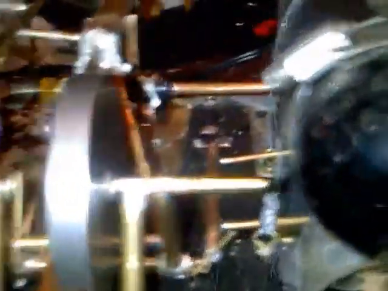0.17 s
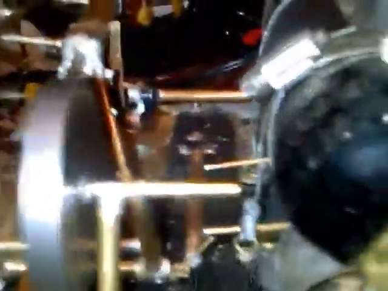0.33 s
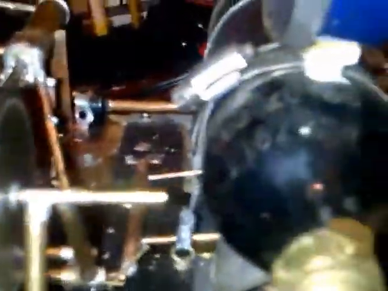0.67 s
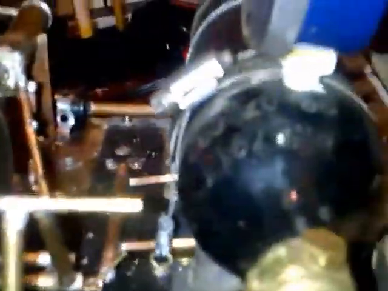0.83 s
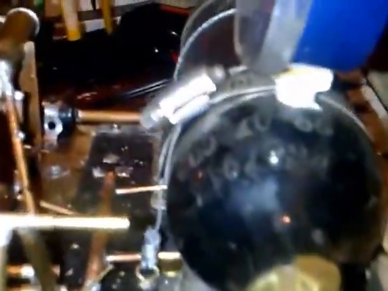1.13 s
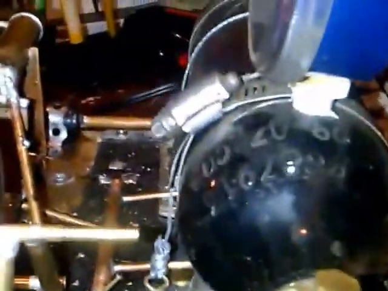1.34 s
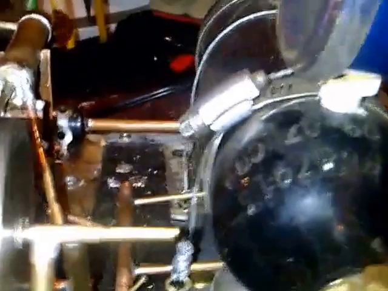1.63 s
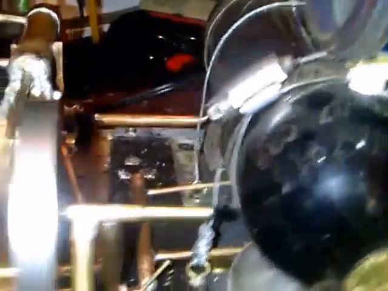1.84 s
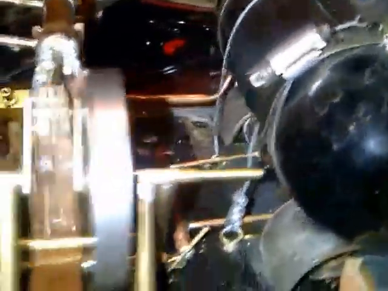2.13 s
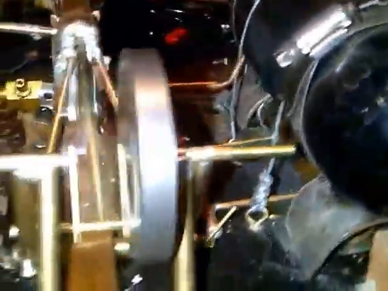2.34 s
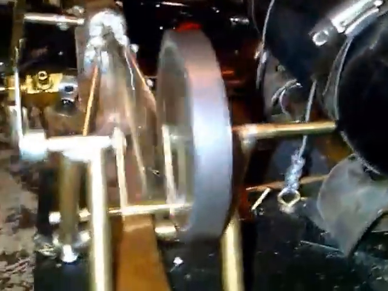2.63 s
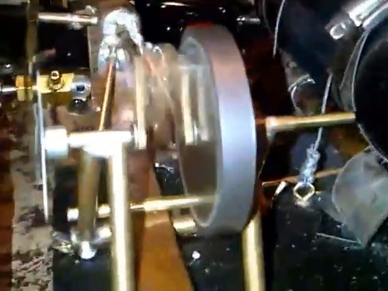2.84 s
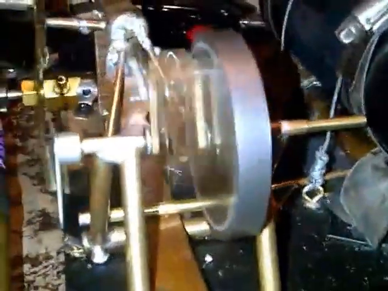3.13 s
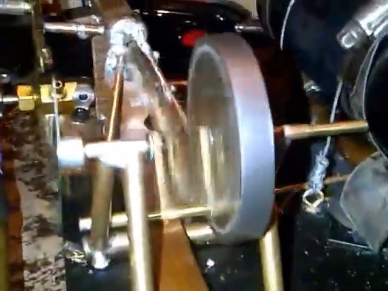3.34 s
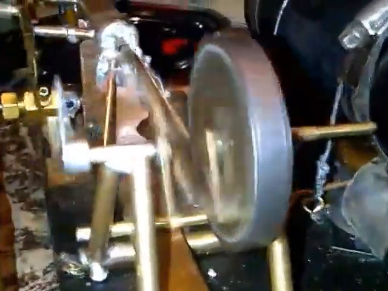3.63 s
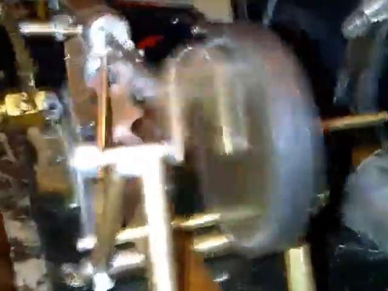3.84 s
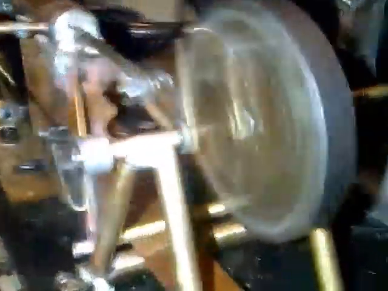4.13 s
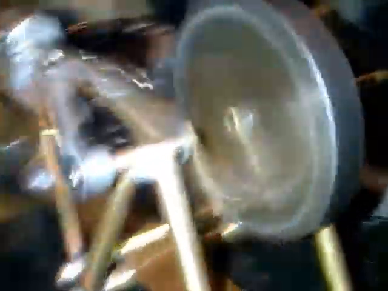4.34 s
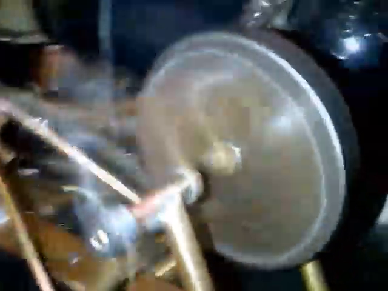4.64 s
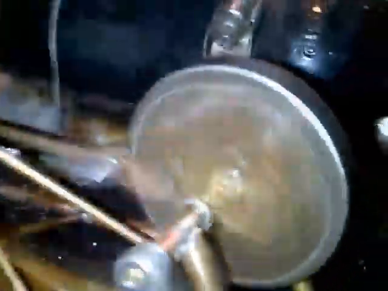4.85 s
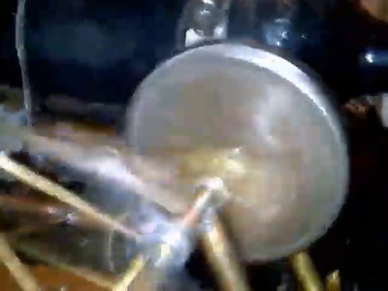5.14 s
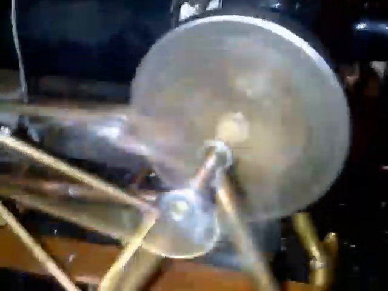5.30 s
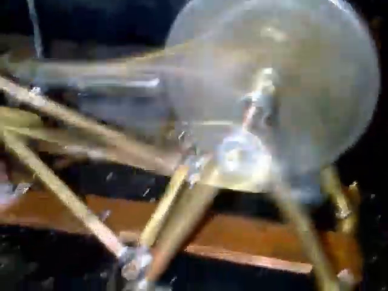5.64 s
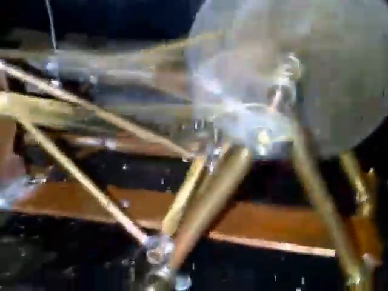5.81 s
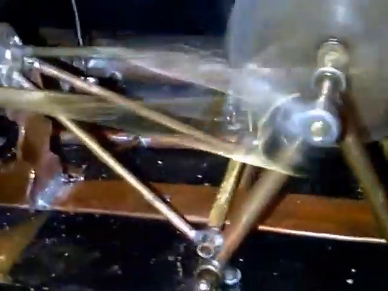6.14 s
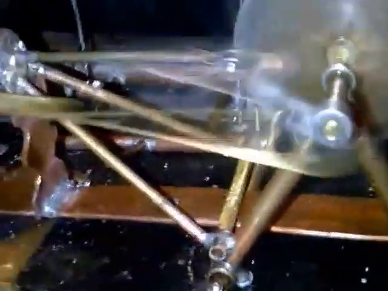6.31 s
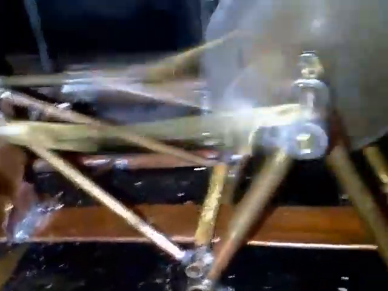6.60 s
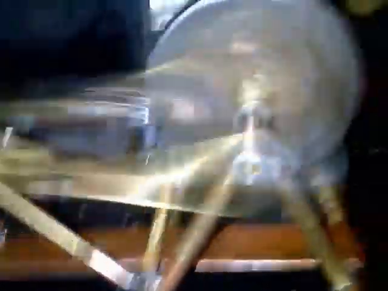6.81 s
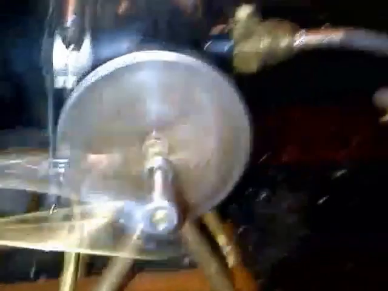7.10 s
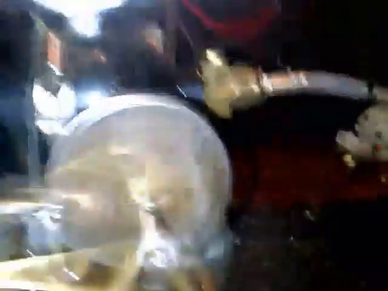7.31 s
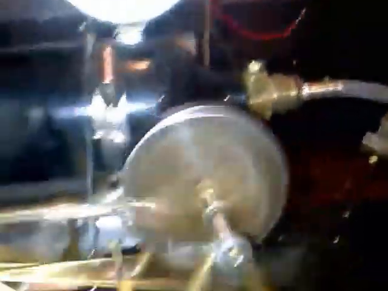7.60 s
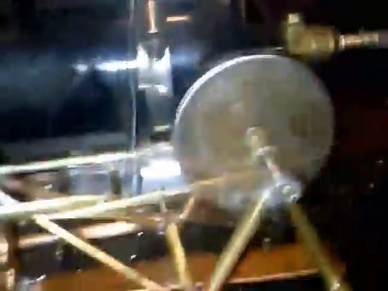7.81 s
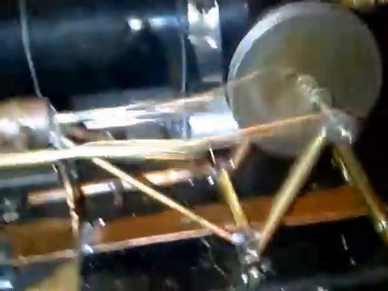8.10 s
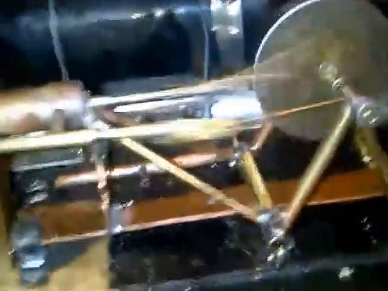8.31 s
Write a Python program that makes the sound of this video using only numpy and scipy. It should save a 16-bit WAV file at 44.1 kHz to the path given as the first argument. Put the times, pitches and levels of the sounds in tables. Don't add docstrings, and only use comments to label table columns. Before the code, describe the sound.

A small piston engine runs steadily on compressed air, about eleven turns a second. Each turn gives a hissing, whistling puff, a dull bench thump and a cluster of brass rattles and pin rings. Air blasts buffet the close handheld microphone heavily from about two to four seconds, then fade, leaving crisp clatter and hiss. Hardly any room is heard.

```python
import sys
import numpy as np
from scipy import signal
from scipy.io import wavfile
from scipy.ndimage import uniform_filter1d

SR = 44100
rng = np.random.default_rng(int(sys.argv[2]) if len(sys.argv) > 2 else 0)


def magnitude_from_level(level_db):
    exponent = np.asarray(level_db, float) / 20
    return 10 ** exponent


def materialize(psi):
    bounded = np.clip(np.atleast_2d(psi).T, -1, 1)
    quanta = np.round(bounded * 32767).astype(np.int16)
    wavfile.write(sys.argv[1], SR, quanta)


N = 373086

# [t/s, turns completed]
CRANK_TURNS = [(0.046, 0), (0.763, 8), (1.491, 16), (2.574, 28), (4.026, 44), (4.738, 52), (6.172, 68),
               (7.239, 80), (7.601, 84), (8.427, 93)]
# [t/s, lead/ms]
FLYWHEEL_LEAD = [(0, 0.091), (4.2, 2.466), (8.46, 6.5)]

# [t/s, view: 0 over the tank, 1 at the crank, 2 facing the flywheel, 3 behind it,
# 4 at the cylinder]; a table "by view" has one value for each of these five
WALK = [(1.6, 0), (2.8, 2.5), (3.9, 1.15), (4.8, 2.5), (5.6, 2.5), (7.0, 3), (7.4, 3.5), (7.85, 4.5)]
# [t/s, level/dB]
NEARNESS = [(0, 0.5), (.7, 0.5), (1.6, 1), (2.4, 0), (3.2, 0.5), (4.2, 0.5), (5.2, -0.1), (6.1, -0.5),
            (7.1, 2), (7.8, -0.5), (8.46, 0)]
# [t/s, share]
FACING = [(3.2, 0.12), (4.6, 0.83)]
# [t/s, share]
BEHIND = [(4.0, 0.022), (7.4, 0.51)]
# [t/s, share]
PIN_BEHIND = [(6.4, 0.15), (7.2, 0.81)]

BENCH_LEVELS = [
    (-43, -44, -45.5, -44.5, -44),
    (-34, -52, -49.5, -48, -51.5),
    (-32, -33.5, -30, -33.5, -36),
    (-49, -30, -41.5, -38.5, -41),
]

# [t/s, level/dB]
DRAUGHT = [(0, -21.5), (.6, -29), (1.2, -35), (1.7, -24.5), (3.5, -26), (4.1, -37), (4.6, -42), (5.4, -53),
           (6.2, -57)]
STEADY_DRAUGHT = (.5, 0.33, .4, 0.39, 0.41)

# [t/s, level/dB, f/Hz, lag of the second lump/ms]
BLOWS = [(1.779, -10.5, 194, 3), (1.864, -18, 85, 6), (1.951, -10.5, 229, 20), (2.043, -7.5, 116, 22),
         (2.128, -9, 215, 8.5), (2.219, -8, 216, 22), (2.317, -2.5, 180, 24), (2.401, -8, 225, 12),
         (2.497, -12.5, 196, 16), (2.585, -3.5, 173, 13), (2.674, -11, 259, 20), (2.769, -12.5, 273, 8),
         (2.862, -12, 190, 5), (2.947, -9, 148.4, 7), (3.041, -12, 141, 6), (3.132, -11, 194, 15),
         (3.224, -11, 185, 5), (3.314, -10.5, 216, 19), (3.403, -11.5, 157, 24), (3.499, -10.5, 141, 7.8),
         (3.589, -15.5, 167, 9), (3.674, -10.5, 142, 20), (3.767, -12.5, 149, 12), (3.865, -16, 126, 6.6),
         (3.957, -15, 235, 5), (4.041, -20.5, 180, 1.9), (4.128, -27.5, 212, 4)]
# [t/s, loss per ms of lag/dB]
SECOND_LOSS = [(2.9, .12), (3.1, 0.5)]
# [t/s, level/dB, f/Hz]
EDDIES = [(0.054, -15.5, 100), (0.066, -13, 99), (0.081, -14, 203), (0.14, -12.5, 126), (0.177, -17, 242),
          (0.244, -21, 90), (0.269, -20.5, 169), (0.336, -17.5, 79.5), (0.41, -11, 123),
          (0.446, -18.5, 232), (0.504, -13, 86), (0.595, -20, 118), (0.69, -19, 138), (0.737, -19.5, 180),
          (0.78, -25.5, 110), (0.964, -21.5, 89), (1.048, -13, 111.6), (1.511, -21, 118), (1.623, -20, 267),
          (1.892, -10, 273), (1.995, -16.5, 190), (2.154, -11.5, 126), (2.431, -14, 100),
          (2.544, -19.5, 253), (2.683, -15, 200), (2.788, -16.5, 139)]

# [t/s, peak level/dB, f/Hz]
TICKS = [(0.0387, -22, 1760), (0.188, -16.5, 1740), (0.4379, -7, 1890), (0.5277, -17.5, 1160),
         (0.7078, -10.5, 1950), (0.7584, -13.5, 1780), (0.9802, -7.5, 1820), (1.034, -8.5, 1910),
         (1.2471, -10.5, 1940), (1.4356, -14.5, 1890), (1.6172, -12, 1900), (1.935, -21, 1510),
         (1.9795, -7.5, 1780), (2.0272, -8, 1880), (2.1028, -9, 1675), (2.8253, -10.5, 1510),
         (3.877, -13, 1480), (4.0991, -10.5, 4900), (4.1872, -11, 4550), (4.2632, -23.5, 1390),
         (4.2786, -10.5, 4720), (4.6294, -12, 4500), (4.7205, -13, 4700), (4.8105, -38, 4620),
         (5.0814, -7.5, 4890), (5.347, -14, 4500)]

# [time from mid puff/ms, f/Hz, t60/s, front level/dB, rear level/dB]
ROD_RINGS = [(-2.5, 850, 0.055, -24, -27.5), (36, 840, 0.046, -21, -25.5), (-34.5, 790, 0.062, -24, -28),
             (39.5, 1900, 0.04, -22, -38)]
# [time from mid puff/ms, f/Hz, t60/s, front level/dB, rear level/dB]
CROSSHEAD_RINGS = [(-4, 2730, .03, -36, -22), (37, 2660, .036, -33, -21), (16, 2690, .026, -40, -22.5),
                   (-28, 2760, .026, -38, -23)]
CROSSHEAD_CARRY = (0, 0.1, 1, 4, 2)

# [f/Hz, width/Hz, front level/dB, level behind the flywheel/dB]
PARTS = [
    [(831, 130, -4.5, 1.5), (699, 167, -2.5, -5)],
    [(1238, 304, -2, 7), (1401, 285, 2.5, -18.5), (1083, 140, -7.5, -10.5)],
    [(1900, 207, 0, -0.5), (1700, 346, 9.5, -15.5)],
    [(2710, 220, -15.5, -1.5), (2440, 800, 4, 5.5), (3010, 600, -1, 1.5), (3340, 220, -7.5, -28)],
]
PART_LEVELS = [
    (-32, -35, -35.5, -33.5, -37.5),
    (-26.5, -26.5, -27.5, -30.5, -34),
    (-27, -33.5, -31.5, -32.5, -38.5),
    (-35.5, -39, -32, -35.5, -30),
]
# [time from mid puff/ms, decay/ms, level over rattle in 4 parts/dB]
KNOCKS_ASIDE = [(-34.5, 6, 10, 3, -8, 5.3), (-31.5, 13, -5.5, 11.7, 6.5, 3),
                (-4.5, 17, -13, 8.7, 11.5, 11.1), (0.5, 3.4, 2, 1.7, 5, 6.8), (31, 1.6, 9.5, 3, 12, 3),
                (31.5, 8.6, 13.5, 14, 12, 7)]
# [time from mid puff/ms, decay/ms, level over rattle in 4 parts/dB]
KNOCKS_FACING = [(-29.5, 19, 2.5, 7.5, -25, 5), (-30.5, 17, 7.6, -7.5, 2, -3.5),
                 (-4.5, 6.1, 12, 15, 16.5, 4), (1, 13, 7.8, 6.5, 12, 2.5), (33.5, 2.8, 3.4, 2.5, -2.5, 20),
                 (30, 2.8, 4.7, -8.5, -2.5, 12.5)]

# [t/s, whistle level/dB, whistle f/Hz]
PORT = [(0, -29, 5620), (.6, -27.5, 5460), (1.5, -26.5, 5470), (2.5, -30, 5170), (3.5, -27.5, 5060),
        (4.0, -26.5, 4740), (5.2, -25.5, 4800), (6.0, -30.5, 4660), (7.0, -31.5, 4520), (7.42, -29, 4370),
        (7.58, -29, 5500), (7.82, -31, 5520), (8.0, -31.5, 4920), (8.46, -28.5, 4420)]
JET_LEVELS = [
    (-9, -4, -12.5, -1.5, -9),
    (-10, -8.5, -12.5, -5.5, -3.5),
    (0, -4.5, 10.5, -3, 2.5),
]
BLURRED = (0, 0, 0.02, 0.4, 1)
UNDERTONE = (-9, -28, -21, -22.5, -24)

REFLECTION_NULL = (0.01, 0.1, 0.6, 0.25, 0.01)

# [t/s, depth/dB]
TRIPS = [(1.778, 6), (2.046, 2.5), (2.065, 3), (2.13, 5.5), (2.22, 1), (2.316, 5.5), (2.404, 8),
         (2.583, 4.5), (3.221, 2.5), (3.676, 1.5)]
# [f/Hz, level/dB]
ROLL_OFF = [(6000, -3.5), (6900, -4.5), (7350, -9), (7600, -17)]


def evened(x, size=None):
    if size is None:
        power = np.mean(x ** 2)
    else:
        power = uniform_filter1d(uniform_filter1d(x ** 2, size), size)
    return x / np.sqrt(abs(power) + 1e-20)


def curves(rows):
    s, *columns = np.transpose(rows)
    return [np.interp(np.arange(N) / SR, s, c) for c in columns]


def seen(values):
    return np.interp(curves(WALK)[0], np.arange(len(values)), values)


def add(mix, s, sound):
    part = mix[max(round(s * SR), 0):][:len(sound)]
    part += sound[:len(part)]


def band(x, lo_hz, hi_hz, order=2):
    return signal.sosfilt(signal.butter(order, [lo_hz, hi_hz], "band", fs=SR, output="sos"), x)


def mode(x, hz, width):
    b, a = signal.iirpeak(hz, hz / (1.6 * width), SR)
    return signal.lfilter(b, a, signal.lfilter(b, a, x))


def resonate(x, hz, width):
    turn = np.exp(2j * np.pi * np.cumsum(hz * np.ones(len(x))) / SR)
    r = np.exp(-1.5 * np.pi * width / SR)
    smooth = signal.lfilter([(1 - r) ** 2], [1, -2 * r, r * r], x / turn + 1e-18)
    return 2 * (turn * smooth).real


def moments(ms, lead=1., jitter_ms=0.):
    s, turns = np.transpose(CRANK_TURNS)
    s = np.interp(np.arange(turns[-1] + 1), turns, s)
    s = np.r_[2 * s[0] - s[1], s, 2 * s[-1] - s[-2]]
    early_ms = lead * np.interp(s, *np.transpose(FLYWHEEL_LEAD))
    shift_ms = ms - early_ms + jitter_ms * rng.standard_normal(len(s))
    at = np.round((s + shift_ms / 1000) * SR).astype(int)
    return at[(at >= 0) & (at < N)]


def train(ms, spread_db, lead=1., jitter_ms=0.):
    out = np.zeros(N)
    at = moments(ms, lead, jitter_ms)
    out[at] = magnitude_from_level(spread_db * rng.uniform(-1.7, 1.7, len(at)))
    return out


def dying(x, ms, rise_ms=0.76):
    rise, fall = np.exp(-1000 / (np.array([rise_ms, ms]) * SR))
    return signal.lfilter([1 - rise], np.convolve([1, -rise], [1, -fall]), x)


def grit(per_s, spread_db, share):
    size = magnitude_from_level(spread_db * np.minimum(rng.exponential(1, N), 4)) * rng.choice([-1, 1], N)
    clicks = evened(size * (rng.random(N) < per_s / SR))
    return np.sqrt(1 - share) * rng.standard_normal(N) + np.sqrt(share) * clicks


def bench():
    hum_db, boom_db, in_db, out_db = map(seen, BENCH_LEVELS)
    t = np.arange(-.012, .02, 1 / SR)
    push = np.sin(2 * np.pi * 150 * t) * np.exp(-(t / 0.0035) ** 2)
    snap = 0.59 * np.sin(2 * np.pi * 380 * t) * np.exp(-(t / 0.0023) ** 2)
    inward = signal.oaconvolve(train(-33.0, 0.41, 0.92, .4), push + snap)[:N]
    outward = signal.oaconvolve(train(3.9, 0.87, 0., 0.83), -push - snap)[:N]
    thumps = band(magnitude_from_level(in_db + 6.5) * inward + magnitude_from_level(out_db + 8.0) * outward, 66, 1500)
    hum = evened(band(rng.standard_normal(N), 260, 620))
    boom = evened(band(rng.standard_normal(N), 63, 220))
    return magnitude_from_level(hum_db + 1.5) * hum + magnitude_from_level(boom_db - 0.5) * boom + thumps


def draught():
    gate = signal.oaconvolve(train(-8.5, 2.2, 0., 2.5), np.hanning(round(0.048 * SR)))[:N]
    air = evened(band(rng.standard_normal(N), 35, 150))
    return magnitude_from_level(curves(DRAUGHT)[0]) * air * (gate + seen(STEADY_DRAUGHT))


def air_lump(t, hz, noise):
    length = 0.0035 * np.sqrt(180 / hz)
    start = 2 * np.pi * noise[:3]
    cycles = hz * t * (1.1 - 12 * np.clip(t, 0, .03))
    swing = np.cos(2 * np.pi * cycles + start[0])
    swing *= np.exp(-(t / (length * np.where(t > 0, 2.3, .7))) ** 2)
    front = 0.72 * np.cos(2 * np.pi * 2.02 * hz * t + start[1]) * np.exp(-(t / (0.55 * length)) ** 2)
    sway = 0.33 * np.cos(2 * np.pi * 55 * t + start[2]) * np.exp(-(t / 0.0081) ** 2)
    flutter = 0.21 * evened(band(noise, 320, 410, order=1)) * np.exp(-(t / length) ** 2)
    wake = 0.26 * evened(band(noise[::-1], 50, 240, order=1))
    wake *= np.exp(-np.maximum(t, 0) / 0.014) * (t > 0)
    return swing + front + sway + flutter + wake, length


def buffet():
    out = np.zeros(N)
    t = np.arange(-1200, 2400) / SR
    lumps = [(s, db, hz) for s, db, hz, lag in BLOWS]
    for s, db, hz, lag in BLOWS:
        loss_db = lag * np.interp(s, *np.transpose(SECOND_LOSS))
        lumps.append((s + lag / 1000, db - loss_db, 0.73 * hz))
    for s, db, hz in lumps + list(EDDIES):
        lump, length = air_lump(t, hz, rng.standard_normal(len(t)))
        add(out, s + t[0] - .7 * length, magnitude_from_level(db + 2.0) * lump)
    return out


def ticks():
    out = np.zeros(N)
    t = np.arange(700) / SR
    shape = np.minimum(t / 0.0017, 1) * np.exp(-(t / 0.0028) ** 2)
    for s, db, hz in TICKS:
        noise = rng.standard_normal(len(t))
        low = evened(mode(noise, 0.49 * hz, .3 * hz))
        ring = shape * (np.sin(2 * np.pi * hz * t) + 0.17 * low + 0.1 * noise)
        add(out, s - .0008, magnitude_from_level(db + 1.0) * ring / abs(ring).max())
    return out


def rings():
    out = np.zeros(N)
    t = np.arange(2600) / SR
    behind = curves(PIN_BEHIND)[0]
    for rows, carry_db, spread_db in ((CROSSHEAD_RINGS, seen(CROSSHEAD_CARRY), 1.5), (ROD_RINGS, 0, 3.0)):
        for ms, hz, t60, front, back in rows:
            ring = magnitude_from_level(-60 * t / t60) * np.sin(2 * np.pi * hz * t) * np.minimum(t / 0.0026, 1)
            level = magnitude_from_level(carry_db + front + (back - front) * behind)
            out += level * signal.oaconvolve(train(ms, spread_db, 1., 1.9), ring)[:N]
    return out


def frame():
    facing, behind = curves(FACING)[0], curves(BEHIND)[0]
    shared = grit(3500, 4.8, 0.42)
    power = np.ones((len(PARTS), N))
    for knocks, share, lead in ((KNOCKS_ASIDE, 1 - facing, 0), (KNOCKS_FACING, facing, 1)):
        for ms, decay_ms, *db in knocks:
            blow = dying(train(ms - 2.5, 1.1, lead, 3.9), decay_ms, rise_ms=3.3)
            power += share * (magnitude_from_level(np.array(db)[:, None]) * blow) ** 2
    out = np.zeros(N)
    for modes, drive, db in zip(PARTS, np.sqrt(power), map(seen, PART_LEVELS)):
        shake = drive * (0.69 * shared + 0.7 * rng.standard_normal(N))
        ring = np.zeros(N)
        for hz, width, front, back in modes:
            ring += magnitude_from_level(front + (back - front) * behind) * mode(shake, hz, width)
        out += magnitude_from_level(db) * evened(ring, size=12000)
    return magnitude_from_level(curves(NEARNESS)[0]) * out


def exhaust():
    db, hz = curves(PORT)
    top_db, leak_db, spit_db = map(seen, JET_LEVELS)
    window = np.linspace(0, 1, round(0.044 * SR))
    opening = np.minimum(27.0 * window, 1) * (0.34 + 0.59 * window)
    puff = signal.oaconvolve(train(-26.5, 1.4, 0.52, 0.6), opening)[:N]
    swell = signal.oaconvolve(train(-6.5, 1.5, 0.27, 2.0), np.hanning(round(0.024 * SR)))[:N]
    spit = dying(train(-14.0, 1.8, 0.41, .8), 5.5, 0.68)
    tail = dying(train(21.4, 0.7, 0.26, 0.73), 7.7)
    flow = np.sqrt(puff ** 2 + 0.3 * tail ** 2 + magnitude_from_level(2 * leak_db))
    jet = grit(6000, 2.6, .3) * (flow + magnitude_from_level(spit_db) * spit)
    blur = seen(BLURRED)
    port = np.sqrt(1 - blur) * resonate(jet, hz, 450) + np.sqrt(blur) * 1.6 * resonate(jet, hz, 1600)
    port += 0.15 * band(jet, 4090, 6040, order=4)
    port += magnitude_from_level(seen(UNDERTONE)) * resonate(jet, .655 * hz, 340)
    fizz = grit(5000, 5.4, 0.2) * (1.1 * flow + 0.55 * swell)
    top = band(fizz, 5900, 7280) + 0.83 * resonate(fizz, np.minimum(hz + 1550, 6900), 570)
    return magnitude_from_level(db) * (evened(port, size=12000) + magnitude_from_level(top_db) * evened(top, size=12000))


def scene():
    engine = ticks() + rings() + frame() + exhaust()
    cancelled = signal.lfilter(*signal.iirpeak(3550, 9.0, SR), engine)
    engine = engine - seen(REFLECTION_NULL) * cancelled
    return (bench() + draught() + buffet() + engine)[None]


def limiter(x, t):
    duck_db = np.zeros(N)
    for s, db in TRIPS:
        dip = (t > s + .003) * np.exp(-((t - s) / 0.048) ** 4)
        duck_db = np.maximum(duck_db, 1.32 * db * dip)
    x = x * magnitude_from_level(-uniform_filter1d(duck_db, size=80))
    ceiling = .6
    return ceiling * np.tanh(x / ceiling)


def roll_off(x):
    return signal.sosfilt(signal.butter(12, 8370, fs=SR, output="sos"), x)


def record(dry):
    t = np.arange(N) / SR
    x = limiter(band(dry, 33, 20000, order=1), t)
    hz, db = np.transpose(ROLL_OFF)
    taps = signal.firwin2(255, np.r_[0, hz, SR / 2], magnitude_from_level(np.r_[0, db, db[-1]]), fs=SR)
    edge = signal.firwin(801, 7740, window=("kaiser", 10), fs=SR)
    x = signal.oaconvolve(x, np.convolve(taps, edge)[None], "same")
    image = band(x * np.cos(2 * np.pi * 16000 * t), 8200, 8450, order=6)
    return roll_off(x + magnitude_from_level(-15) * image)


dry = scene()
out = record(dry)
materialize(out)
```